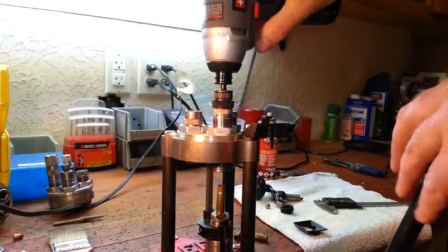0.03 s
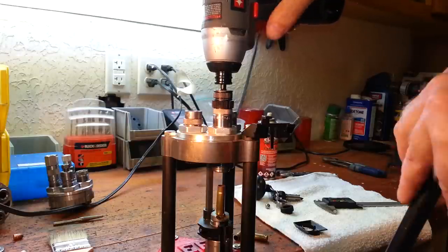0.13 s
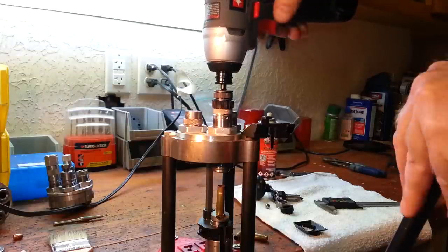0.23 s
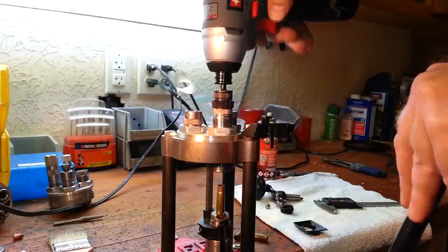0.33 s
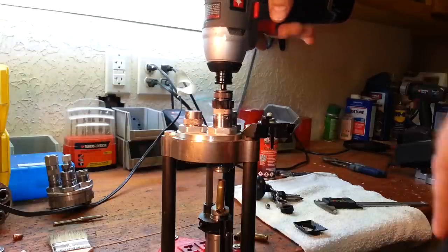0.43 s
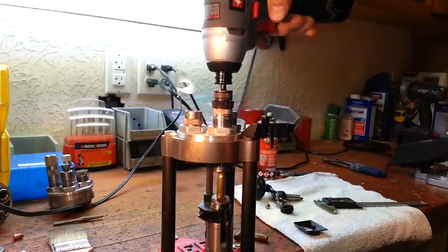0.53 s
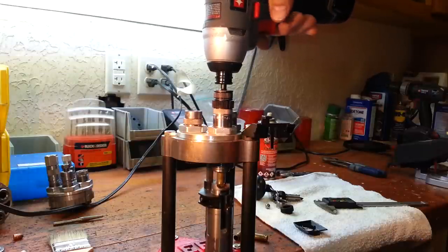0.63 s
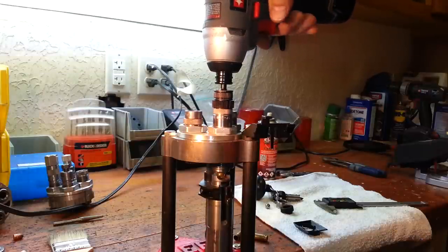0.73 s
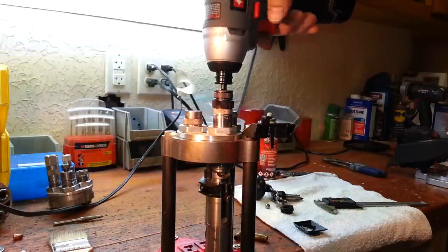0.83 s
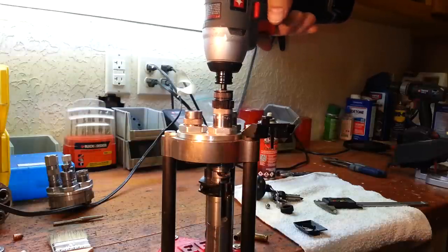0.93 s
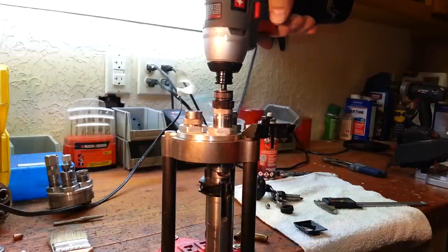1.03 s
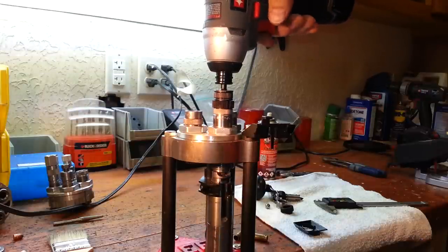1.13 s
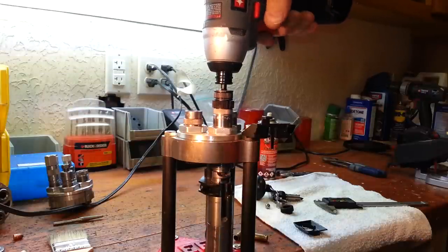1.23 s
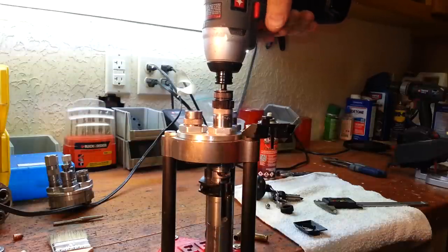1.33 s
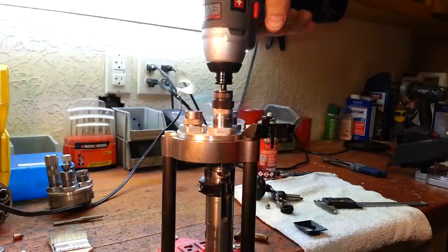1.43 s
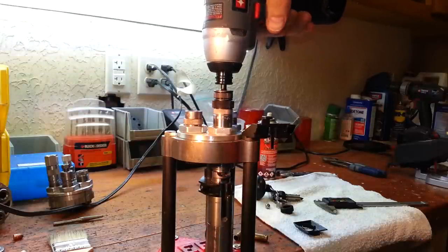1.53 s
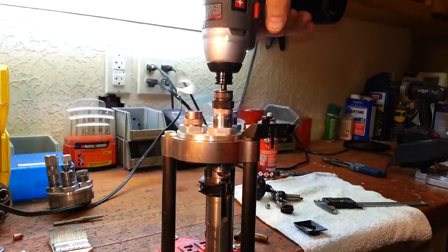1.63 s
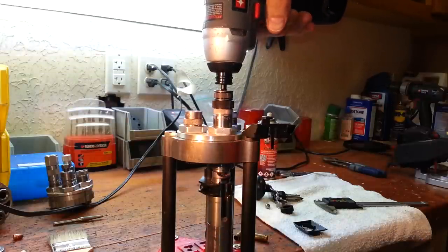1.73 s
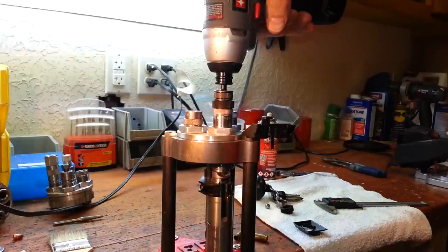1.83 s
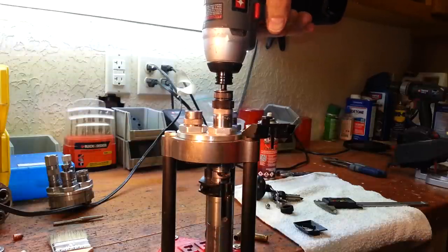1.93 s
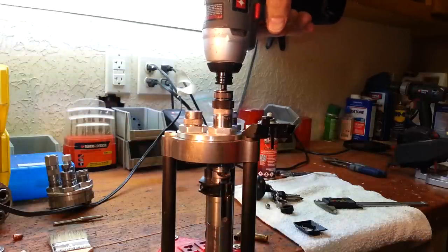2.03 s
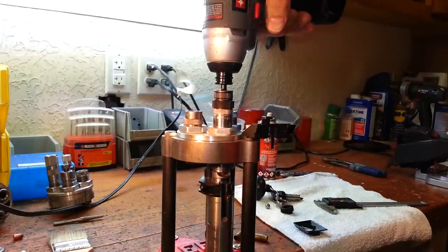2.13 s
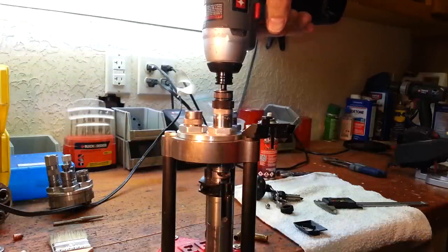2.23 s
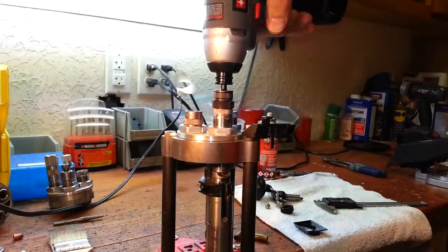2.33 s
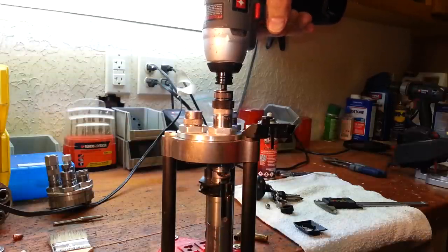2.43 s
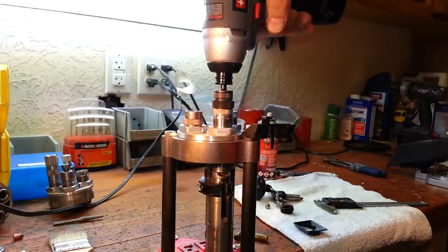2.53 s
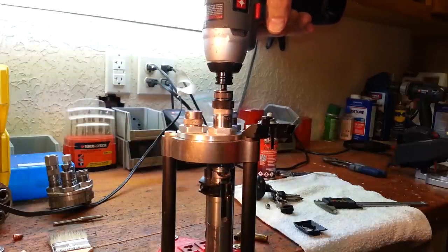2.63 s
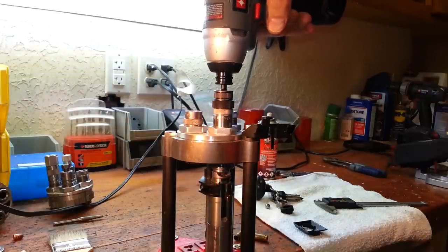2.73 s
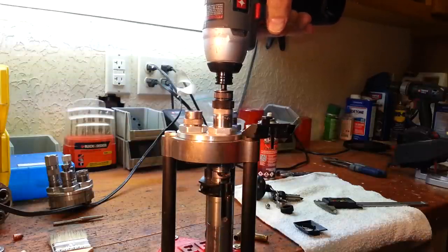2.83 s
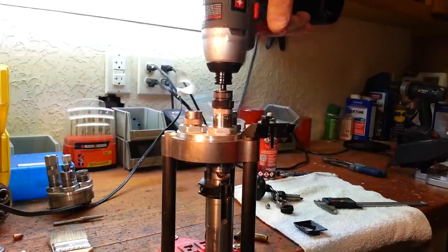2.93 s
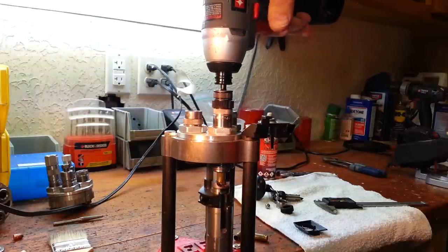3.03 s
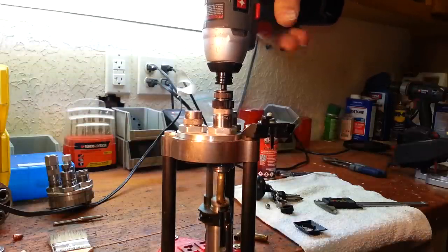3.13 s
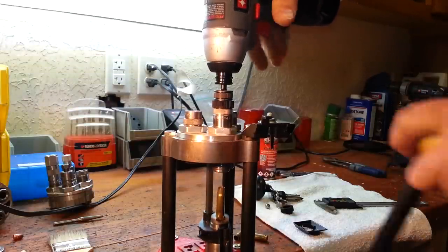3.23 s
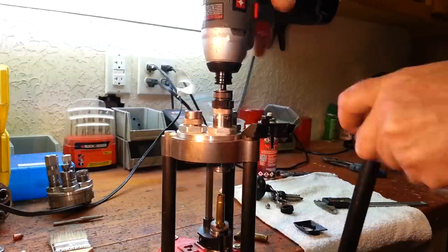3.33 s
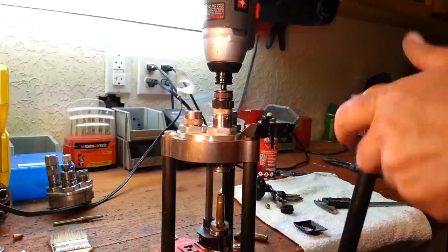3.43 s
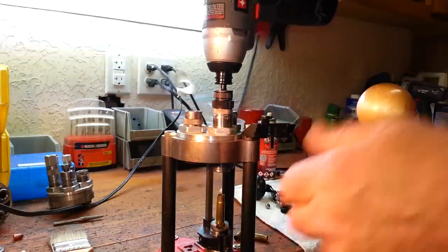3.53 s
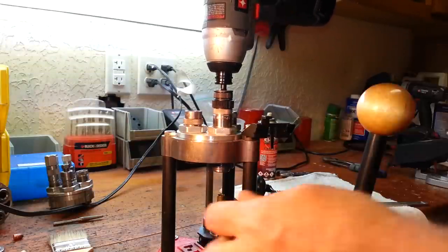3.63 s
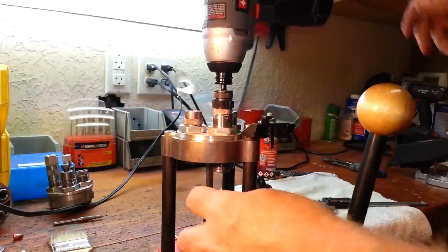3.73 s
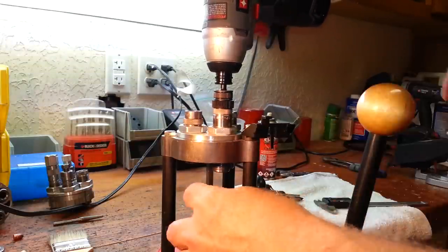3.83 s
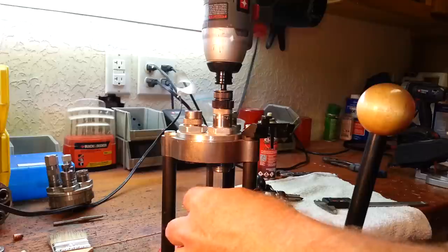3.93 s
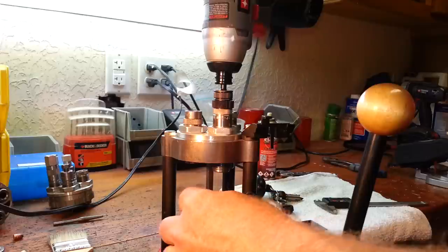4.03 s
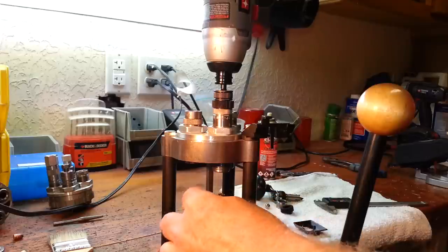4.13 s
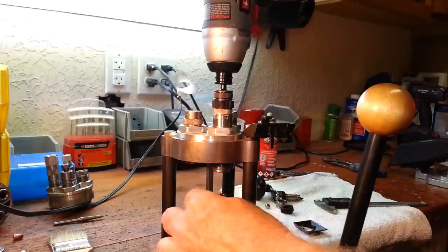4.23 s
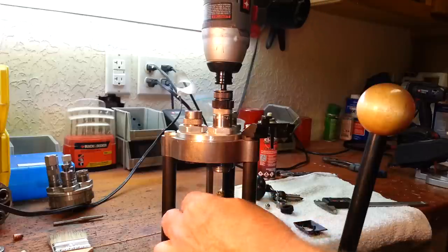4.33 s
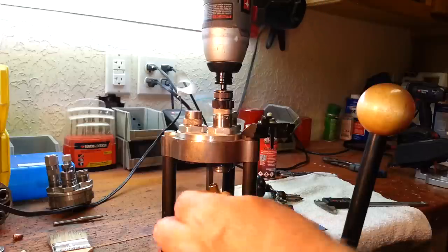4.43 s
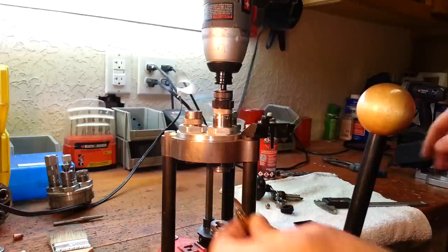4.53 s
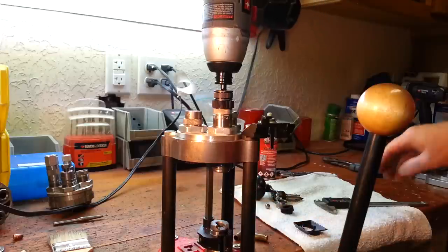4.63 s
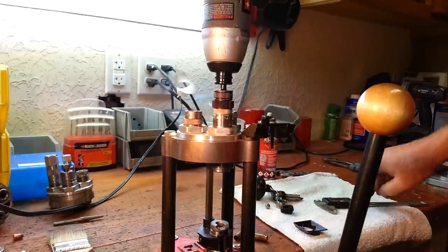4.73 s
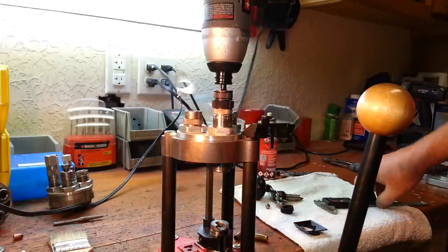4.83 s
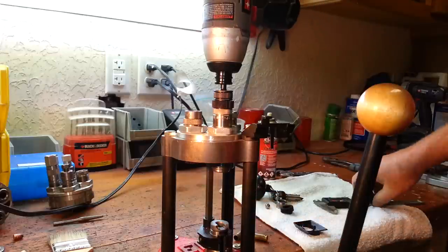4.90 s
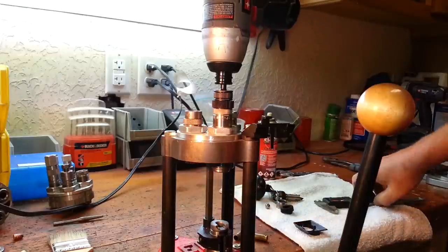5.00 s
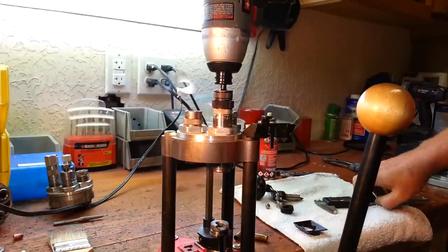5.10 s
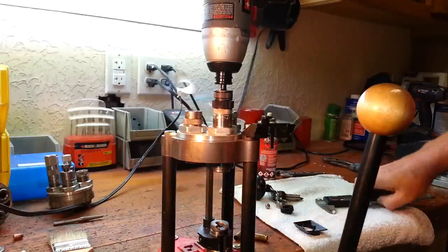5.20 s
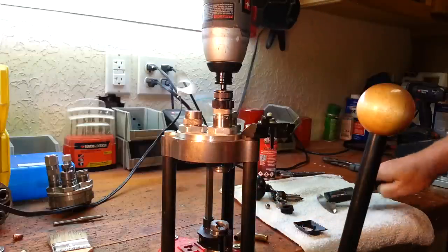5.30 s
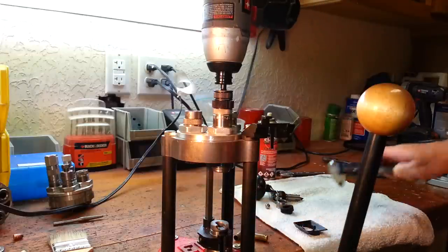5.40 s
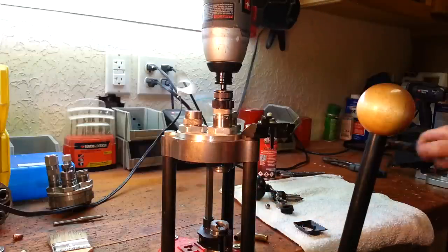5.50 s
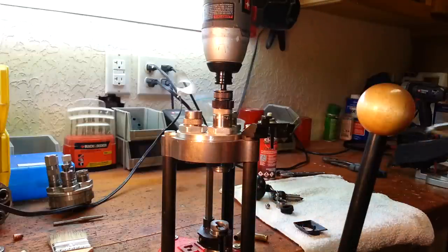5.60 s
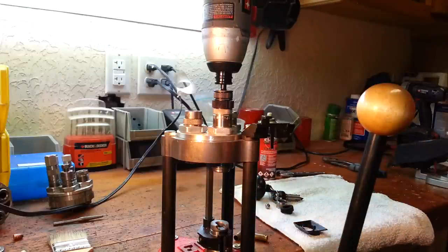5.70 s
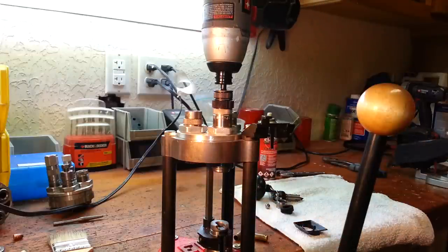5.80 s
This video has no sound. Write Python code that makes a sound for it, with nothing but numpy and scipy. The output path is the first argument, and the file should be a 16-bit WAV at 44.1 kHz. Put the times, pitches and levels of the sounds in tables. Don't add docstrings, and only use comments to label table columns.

```python
import sys
import numpy as np
from scipy import signal
from scipy.fft import rfft, irfft, next_fast_len
from scipy.io import wavfile
from scipy.ndimage import map_coordinates

SR = 44100
rng = np.random.default_rng(int(sys.argv[2]) if len(sys.argv) > 2 else 0)


def bounce(signal):
    frames = np.transpose(np.atleast_2d(signal))
    limited = np.clip(frames, -1, 1)
    pcm = np.round(limited * 32767).astype(np.int16)
    wavfile.write(sys.argv[1], SR, pcm)


def gain_from_db(level_db):
    decades = np.asarray(level_db, float) / 20
    return 10 ** decades


N = 258426
ON_S, BRAKE_S, STOP_S = 1.557, 3.06, 3.1


def unit(x):
    return x / np.sqrt(np.mean(np.abs(x) ** 2) + 1e-20)


def along(points, hz):
    f, v = np.transpose(points)
    return np.interp(np.log(hz + 1), np.log(f + 1), v)


def wobble(rate, size=N):
    knots = rng.standard_normal(int(size * rate / SR) + 4)
    return map_coordinates(knots, [np.arange(size) * rate / SR])


def filtered(x, response):
    m = next_fast_len(x.shape[-1] + SR // 2)
    spectrum = rfft(x, m) * response(np.fft.rfftfreq(m, 1 / SR))
    return irfft(spectrum, m)[..., :x.shape[-1]]


def modes(rows):
    return lambda f: sum(gain_from_db(db) * 1j * f * w / (c * c - f * f + 1j * f * w) for c, w, db in rows)


def noise(spectrum, channels=1, size=N):
    white = rng.standard_normal((channels, size))
    return unit(filtered(white, lambda hz: gain_from_db(along(spectrum, hz))))


# centre_hz, width_hz, level_db
BENCH_MODES = [(311, 37, 6.5), (348.4, 28, 8.5), (315.8, 59, -10), (416, 120, -17)]
# centre_hz, width_hz, level_db
LEG_MODES = [(138, 4.7, 3), (156, 26, 2.5), (167, 66, -9), (214.2, 25, -1)]
# frequency_hz, density_db
RUMBLE_SPECTRUM = [(15, -54), (25, -27.5), (41, -12.5), (108, -10), (189, -8), (367, -18), (448, -19),
                   (600, -20.5), (780, -51.5), (1320, -120)]
# frequency_hz, density_db
RUSTLE_SPECTRUM = [(180, -29.5), (300, 0), (375, -1.5), (412, -2.5), (743, -6.5), (951, -13), (1690, -13),
                   (5000, -26.5), (6500, -51), (11000, -120)]
# frequency_hz, density_db
HISS_SPECTRUM = [(410, -33.5), (700, -3.5), (1420, -8), (2110, -9), (2520, -8.5), (5960, -14), (13900, -13),
                 (15000, -19)]
# pitch_hz, level_db
HUM_LINES = [(118.4, -66), (317.6, -77), (479.1, -77)]
# start_s, length_s, legs_db, rustle_db, swish_db
STROKES = [
    (-.3, 1.98, -64, -57, -65.5),
    (0.87, 0.21, -81, -46, -78),
    (1.053, 0.2, -51, -71, -72),
    (3.144, 0.61, -54.5, -57.5, -63),
    (3.7, 3, -76.5, -69, -81),
    (4.077, 0.34, -63.5, -66.5, -70),
    (5.375, .22, -63.5, -68, -77),
]


def background():
    rumble_db, rustle_db, hiss_db = -60.5, -77.5, -68
    t = np.arange(N) / SR
    arcs = np.array([np.sin(np.pi * np.clip((t - s) / length, 0, 1)) for s, length, *_ in STROKES])
    shove, brush, swish = gain_from_db(np.transpose(STROKES)[2:]) @ arcs
    hum = sum(gain_from_db(db + 1 + 2 * wobble(4)) * np.sin(2 * np.pi * hz * t) for hz, db in HUM_LINES)
    rumble = 0.49 * noise(RUMBLE_SPECTRUM) + 0.8 * noise(RUMBLE_SPECTRUM, channels=2)
    frame = modes(LEG_MODES + BENCH_MODES)
    legs = unit(filtered(noise(RUMBLE_SPECTRUM), lambda f: frame(f) * np.minimum(f / 120, 1) ** 2))
    rustle = noise(RUSTLE_SPECTRUM, channels=2) * gain_from_db(0.67 * wobble(10))
    hiss = np.hypot(gain_from_db(hiss_db), swish) * noise(HISS_SPECTRUM, channels=2)
    moving = gain_from_db(rumble_db) * rumble + shove * legs + np.hypot(gain_from_db(rustle_db), brush) * rustle
    return hum + gain_from_db(2) * moving + gain_from_db(6) * hiss


# frequency_hz, t60_s
GARAGE_DECAY = [(150, 0.83), (400, 0.39), (1500, 0.54), (4000, .45), (8000, 0.31), (14000, .15)]
# frequency_hz, level_db
ROOM_LEVEL = [(150, -17), (400, -14.5), (700, -5.5), (1200, 2.5), (4000, -1), (12000, 1.5)]


def garage(x):
    hz, t, z = signal.stft(rng.standard_normal((2, SR)), SR, nperseg=256)
    clutter = gain_from_db(-60 * t / 0.04)
    walls = gain_from_db(-6.5 - 60 * t / along(GARAGE_DECAY, hz)[:, None])
    tail = signal.istft(z * (clutter + walls), SR, nperseg=256)[1]
    tail = filtered(tail, lambda f: gain_from_db(along(ROOM_LEVEL, f))) / np.linalg.norm(tail[0])
    return signal.fftconvolve(np.pad(x, (60, 0))[None], tail, axes=1)[:, :N]


# start_s, pitch_hz, level_db, t60_s
RINGS = [(.004, 3505, -45.5, 0.073), (.02, 4160, -52, 0.074), (.392, 1190, -27, 0.023),
         (0.428, 1220, -36.5, 0.056), (0.771, 933, -24.5, 0.04), (1.33, 4240, -54, 0.028),
         (1.497, 820, -52, .03), (3.09, 3950, -38, .02), (3.414, 970, -36, 0.052), (3.478, 913, -29, .04),
         (4.28, 943, -46.5, 0.069), (4.334, 823, -39, .03), (5.214, 2030, -56, 0.014),
         (5.397, 490, -29.5, 0.0095), (5.4275, 4800, -34, .004), (4.172, 5640, -37, .012),
         (5.76, 3370, -41, 0.026)]


def rings():
    out, n = np.zeros(N + SR), SR // 4
    t = np.arange(n) / SR
    for s, hz, db, t60 in RINGS:
        drift = 1.6 * wobble(250, size=n) * np.minimum(t / 0.005, 1)
        lower = np.sin(2 * np.pi * hz * t + drift)
        upper = 0.5 * np.sin(2 * np.pi * 1.06 * hz * t + 1.5 - drift)
        envelope = gain_from_db(db - 60 * t / t60) * (1 - np.exp(-t / 0.0009))
        out[round(s * SR):][:n] += (lower + upper) * envelope
    return out[:N]


# pitch_hz, width_hz, t60_s, rise_s, level_db
BURSTS = [
    (620, 470, 0.25, .003, 1.5),
    (1818, 1760, 0.091, 0.0033, 0),
    (4700, 3200, 0.026, 0.0026, 1),
    (9430, 5000, 0.018, 0.0012, -2.5),
]
# start_s, bench_db, air_db, brightness_octaves over 250 Hz, spread_octaves
KNOCKS = [(0.386, -37, -35, 2.38, 0.89), (0.428, -39, -48, 1.6, 2.1), (0.762, -34, -37.5, 3.2, 2.4),
          (0.809, -46, -46, 1.5, 3.1), (0.912, -21, -28, 2.38, 1), (1.094, -20.5, -32.5, 0.51, 1),
          (1.499, -67, -54, 3.3, 3.8), (1.525, -40, -39.5, 3.5, 1.9), (1.562, -35, -22.5, 3, 0.98),
          (3.409, -36, -36, 2.2, 1.35), (3.473, -37, -42, 1.1, 1.96), (4.171, -53, -47, 3.26, 1.94),
          (4.273, -61, -56, 1.2, 3.6), (4.332, -64, -55, 1.8, 0.82), (4.502, -49.5, -47.5, 2.45, 1.2),
          (5.213, -76, -65, 3.8, 1.9), (5.395, -48, -57, 1.4, 3.1), (5.426, -63, -56, 4, 1),
          (5.757, -59.5, -52, 3.65, 0.88)]
# start_s, bench_db
BUMPS = [(0.582, -40), (0.641, -38), (0.714, -49.5), (0.854, -42), (0.964, -34), (0.989, -48.5),
         (1.04, -41), (1.142, -37), (1.181, -46.5), (3.117, -14.5), (3.192, -26.5), (3.494, -40.5)]


def knocks():
    crack_db, crack_t60_s = 7.5, 0.019
    air, push = np.zeros(N + SR), np.zeros(N + SR)
    t = np.arange(SR // 4) / SR
    for s, _, air_db, bright, spread in KNOCKS:
        grits = rng.standard_normal((4, len(t)))
        for (hz, width_hz, t60, rise, db), grit in zip(BURSTS, grits):
            level_db = air_db - 6 * ((np.log2(hz / 250) - bright) / spread) ** 2
            decay = gain_from_db(-60 * t / t60) + gain_from_db(crack_db - 60 * t / crack_t60_s)
            burst = grit * gain_from_db(level_db + db) * decay * (1 - np.exp(-t / rise))
            burst = burst * (SR / width_hz / 3) ** 0.5
            band = modes([(hz, 1.7 * width_hz, 0)])
            air[round(s * SR):][:len(t)] += filtered(burst, lambda f: band(f) ** 4)
    for s, bench_db, *_ in KNOCKS + BUMPS:
        push[round((s + 0.003) * SR)] = gain_from_db(bench_db + 39)
    padded = modes([(330, 150, 0)])
    top, legs = modes(BENCH_MODES), modes(LEG_MODES)
    bench = filtered(push, lambda f: padded(f) ** 4 * (1 + 0.72 * top(f)) + gain_from_db(-9.5) * legs(f) ** 2)
    return (air + bench)[:N]


# start_s, end_s, pitch_hz, level_db
COIL_TONE = (1.541, 1.558, 3900, -43)


def switch():
    start, end, hz, db = COIL_TONE
    t = np.arange(N) / SR
    gate = np.clip(np.minimum(t - start, end - t) / 0.0028, 0, 1)
    return gain_from_db(db) * gate * (np.sin(2 * np.pi * hz * t) + 0.34 * np.sin(2 * np.pi * 2 * hz * t))


# frequency_hz, density_db
RATTLE_SPECTRUM = [(120, -46.5), (200, -17.5), (323, -2.5), (563, -11), (750, -13), (880, -12.5),
                   (1170, -21), (5760, -27), (9000, -34.5), (11700, -63), (19800, -120)]


def coast():
    after = np.arange(N) / SR - STOP_S
    level_db = -26.5 - 95.5 * np.abs(after) + 1.9 * wobble(60)
    return (after > 0) * gain_from_db(level_db) * noise(RATTLE_SPECTRUM)[0]


TOOTH_ORDERS = [45.05, 88.7, 131, 176.5, 221.3, 266.5, 308, 352, 396, 439]
# level_db, swell once a turn, wander_rad
TOOTH_LEVELS = [(-8.5, .6, 0.57), (-11, 0.39, 0.35), (-4.5, 0.44, 0.7), (-9.5, 0.29, 0.27),
                (-5.5, 0.27, 2.3), (-20, 0.28, 1.4), (-17.5, 0.26, 2.7), (-20, 0.38, 1.6), (-24.5, .6, 1.5),
                (-23, .6, 1.6)]
LINE_ORDERS = [4.05, 4.47, 5, 6.48, 10, 10.96, 18.9, 21.93, 35, 37.9, 176.5, 50.4, 87.5, 89.7, 108.4]
LINE_LEVELS = [-41.5, -38, -52.5, -43.5, -33.5, -31, -46, -40, -45.5, -40, -46.5, -43, -46, -44.5, -45.5]
# frequency_hz, density_db
RASP_SPECTRUM = [(250, -38.5), (420, -16), (560, -11), (900, -11.5), (1250, -13), (2100, -11.5),
                 (3500, -9.5), (5100, -12), (6400, -3), (7900, -17.5), (9400, -19), (12200, -18),
                 (14300, -19.5), (15000, -15.5)]
# time_s, load_db
LOAD = [
    (1.56, 4),
    (1.62, 4),
    (1.72, 1.5),
    (1.95, 0.13),
    (2.45, -0.5),
    (2.9, 0.93),
    (3.06, -0.6),
]


def spindle_speed(t):
    full_hz, sag_hz_per_s, brake_hz_per_s2 = 1434, 6, 72000
    spin_up_s, head_start_s = 0.118, 0.1
    braked = np.maximum(t + ON_S - BRAKE_S, 0)
    spin_up = 1 - np.exp(-((t + head_start_s) / spin_up_s) ** 2)
    tooth_hz = (full_hz - sag_hz_per_s * t) * spin_up - brake_hz_per_s2 * braked ** 2
    return tooth_hz, tooth_hz / full_hz


def gear_whine(turn, tight):
    n, whine = len(turn), 0
    for k, (db, swell, wander) in zip(TOOTH_ORDERS, TOOTH_LEVELS):
        bead = np.exp(swell * tight) * gain_from_db(0.9 * wobble(45, size=n))
        skirt = 1.24 * wobble(260, size=n) * np.cos(k * turn)
        phase = k * turn + wander * (wobble(45, size=n) + np.sin(turn + k))
        whine = whine + gain_from_db(db) * unit(bead) * (skirt + np.sin(phase))
    return whine


def spindle_lines(turn):
    lines = 0
    for k, db in zip(LINE_ORDERS, LINE_LEVELS):
        level_db = db + 2 * wobble(9, size=len(turn))
        lines = lines + gain_from_db(level_db) * np.sin(k * turn + 0.73 * wobble(9.25, size=len(turn)))
    return lines


def gear_chatter(n):
    hits = rng.standard_normal(n) * gain_from_db(4 * wobble(120, size=n))
    return unit(filtered(hits, modes([(2300, 540, 1), (4600, 900, -4.5)])))


def driver():
    teeth = 44
    gear_db, chatter_db, shake_db, thrum_db = -19.5, 5, -25, -34
    engage_s, brake_db_per_s = 0.022, 110
    first, n = round(ON_S * SR), round((STOP_S - ON_S) * SR)
    t = np.arange(n) / SR
    tooth_hz, speed = spindle_speed(t)
    load_db = np.interp((first + np.arange(n)) / SR, *np.transpose(LOAD))
    braked = np.maximum(t + ON_S - BRAKE_S, 0)
    engaged = (1 - np.exp(-t / engage_s)) * gain_from_db(-brake_db_per_s * braked)
    turn = 2 * np.pi * np.cumsum(tooth_hz * (1 + 0.001189 * wobble(10, size=n))) / SR / teeth
    seated = speed ** 1.2
    tight = np.cos(turn) + 0.5 * np.cos(2 * turn + 0.4) + 0.25 * np.cos(turn / 2)
    tones = gain_from_db(-2.3) * gear_whine(turn, tight) + gain_from_db(23.5) * seated ** 10 * spindle_lines(turn)
    rasp = noise(RASP_SPECTRUM, size=n)[0] * gain_from_db(0.99 * wobble(110, size=n) + 0.66 * tight)
    chatter = gain_from_db(chatter_db) * (1 - seated) * seated * gear_chatter(n)
    air = gain_from_db(gear_db + load_db) * (rasp + seated * tones + chatter)
    top = modes(BENCH_MODES)
    shake = unit(filtered(rng.standard_normal(n), lambda f: top(f) ** 2))
    shake = gain_from_db(shake_db + 1.6 * load_db) * shake
    thrum = unit(filtered(rng.standard_normal(n), modes(LEG_MODES)))
    thrum = gain_from_db(thrum_db) * speed ** 2.3 * thrum
    return np.pad(engaged * (air + shake + thrum), (first, N - first - n))


# frequency_hz, left_minus_right_db
PORT_TILT = [(60, -2), (110, -3), (200, -0.5), (380, 2), (700, -3.5), (1290, 0.5), (2380, -1.5), (4400, -4),
             (8120, -10), (15000, -8.5)]
# frequency_hz, left_lead_rad
PORT_LEAD = [(0, 1), (950, 0), (1210, -1.5), (1810, 7), (2330, 4.5), (2840, 8), (3880, 4.5), (4220, 6),
             (5940, 3.5), (7320, 5), (8270, 5), (9990, 5), (11500, 9.5), (15300, 11)]
# centre_hz, width_hz, depth_db
PORT_DIPS = [(6350, 1200, -3.5), (9370, 250, -1.5), (10600, 520, 0)]


def scene():
    low_cut_hz = 112
    press = coast() + switch() + knocks() + rings()
    heard = press + driver() + garage(press + driver())
    side = np.array([[0.5], [-0.5]])
    dips = modes(PORT_DIPS)

    def stiff(f):
        x = f / low_cut_hz
        return (1j * x) ** 4 / (1 + 1.2j * x - x ** 2) ** 2 + gain_from_db(-33.5)

    def ports(f):
        colour = gain_from_db(side * along(PORT_TILT, f)) * np.exp(1j * side * along(PORT_LEAD, f))
        return stiff(f) * (1 - dips(f)) * colour

    return filtered(gain_from_db(-1.5) * heard, ports) + background()


def roll_off(x):
    return signal.sosfilt(signal.butter(12, 15720, fs=SR, output="sos"), x)


def record(dry):
    top_hz = 14540
    held = dry / (1 + np.abs(dry / 0.95) ** 6) ** (1 / 6)
    mix = filtered(held, lambda hz: np.clip((top_hz - hz) / 60, 0, 1))
    return roll_off(mix)


dry = scene()
out = record(dry)
bounce(out)
```